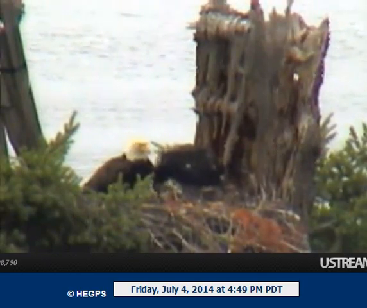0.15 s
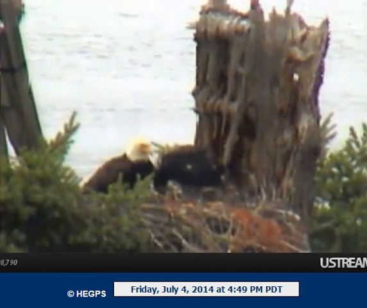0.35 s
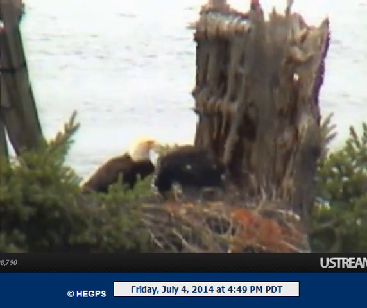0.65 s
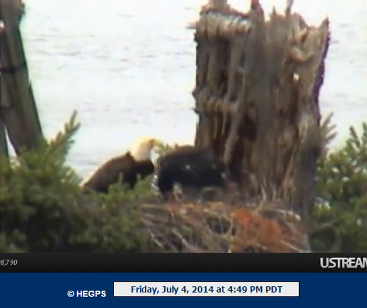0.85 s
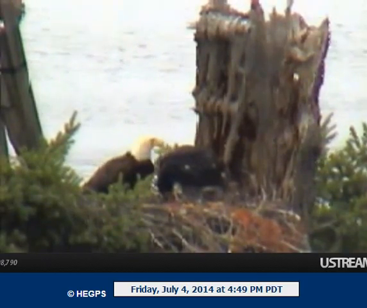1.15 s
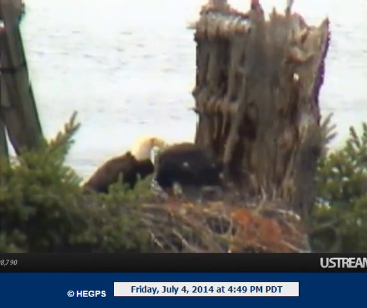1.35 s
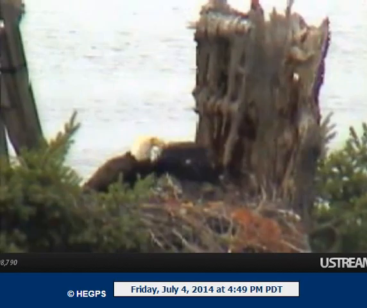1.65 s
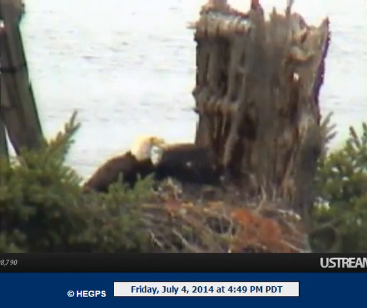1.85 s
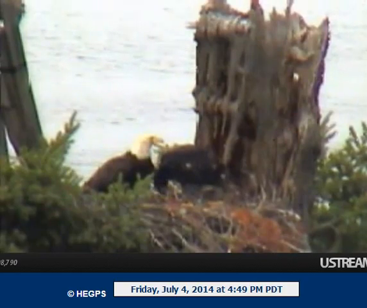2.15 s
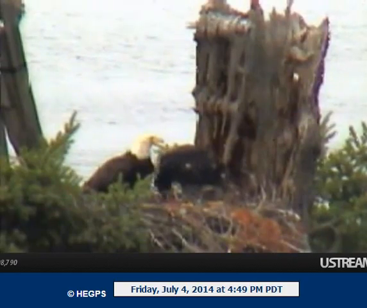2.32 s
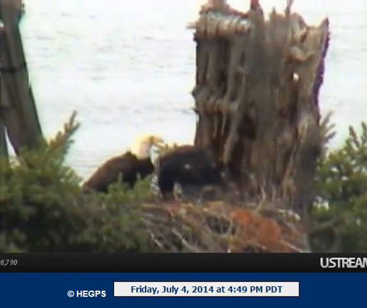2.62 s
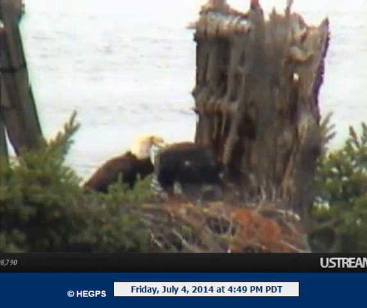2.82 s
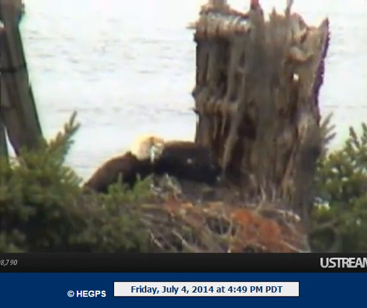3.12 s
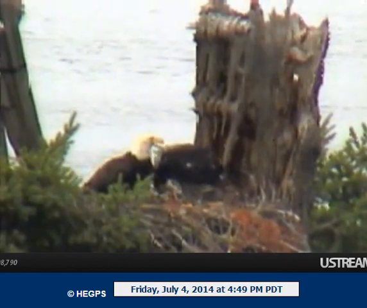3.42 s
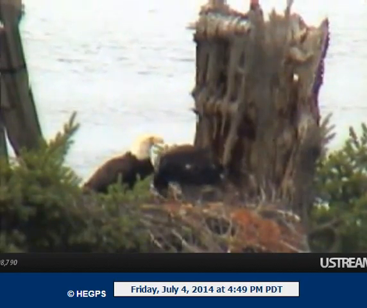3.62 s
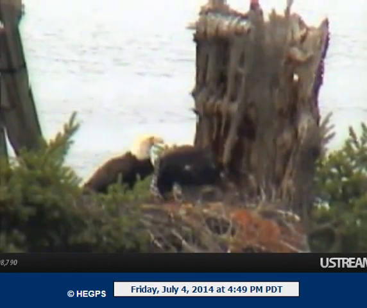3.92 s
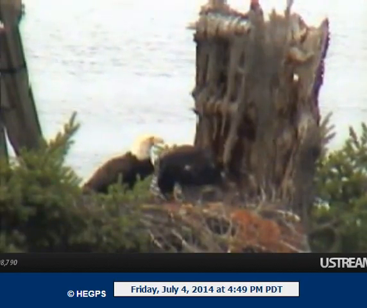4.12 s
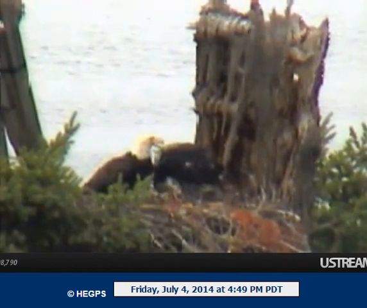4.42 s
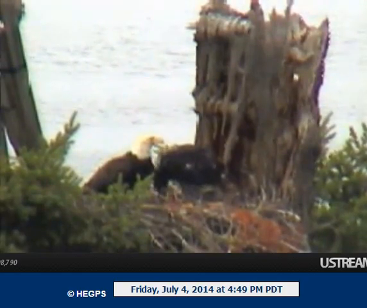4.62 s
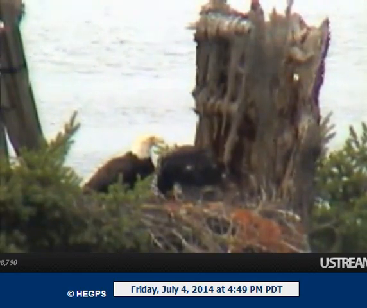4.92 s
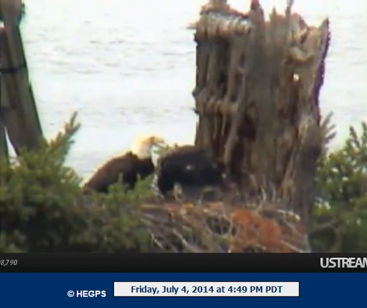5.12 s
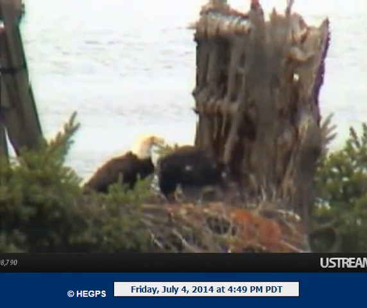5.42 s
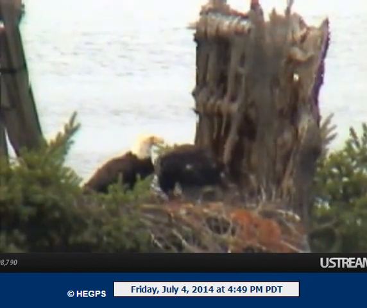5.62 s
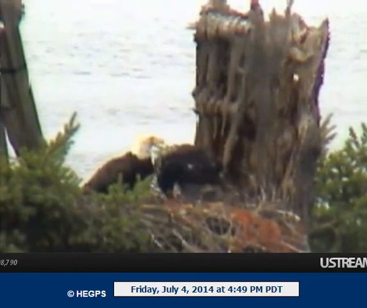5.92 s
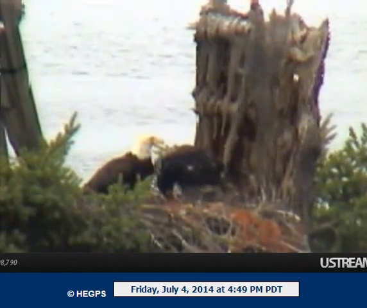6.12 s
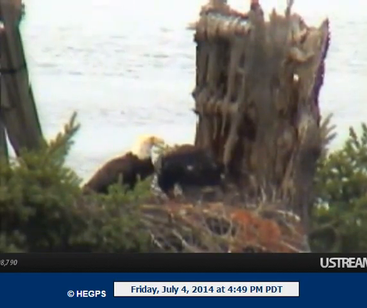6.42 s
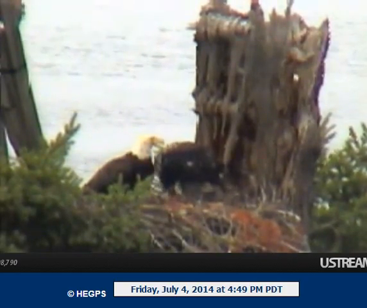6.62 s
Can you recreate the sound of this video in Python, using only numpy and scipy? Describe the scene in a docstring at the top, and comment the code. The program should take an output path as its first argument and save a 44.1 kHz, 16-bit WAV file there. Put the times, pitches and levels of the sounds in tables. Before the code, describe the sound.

A low, hollow rumble of wind and distant surf runs for the whole seven seconds and is the loudest sound. Low hums waver beneath it, with a thin electrical buzz and a few soft passing tones. From the start until about 2 seconds, a distant crow gives five rough, evenly spaced caws with a slight echo. A young eagle whistles faintly in a quick run of short, high, breathy, gliding notes during the first second, and adds one note near 2 seconds. More faint runs follow at about 3 to 3.5 seconds, 4.3 to 5 seconds and 6 to 6.7 seconds. Twigs tick lightly in the nest here and there from 1.2 to 6.4 seconds. Puffs of wind knock on the microphone with short, dull thumps between 1.4 and 4.8 seconds, the strongest at about 4.4 seconds.

```python
"""A hollow by the shore, wind and surf booming around the microphone and puffs knocking it.
In a nest above, a young eagle whistles faintly in gliding, breathy notes, and twigs tick.
Further off a crow caws five times, rough pulses through its throat; trunks and water echo both birds.
Low hums waver underneath and a few soft tones pass. The line carries a thin mains buzz,
and a coarse change of sampling rate casts pale copies of every sound into the treble."""
import sys
import numpy as np
from scipy import signal
from scipy.fft import rfft, irfft
from scipy.io import wavfile
from scipy.ndimage import uniform_filter1d

SR = 44100
rng = np.random.default_rng(int(sys.argv[2]) if len(sys.argv) > 2 else 0)


def pcm_store(signal):
    """Save signal as 16-bit PCM."""
    levels = np.round(np.clip(np.atleast_2d(signal), -1, 1) * 32767)
    wavfile.write(sys.argv[1], SR, levels.astype(np.int16).T)


N = 298116

# buzz on the line, odd multiples of the mains from the eleventh up: level_db
BUZZ_HARMONICS = [-47.5, -58, -54.5, -68.5, -58.5, -53, -52.5, -69.5, -61, -70.5, -57, -74, -62.5, -59.5,
                  -61.5, -75.5, -68.5, -71, -60, -67.5, -67.5, -61.5, -61, -61.5, -63, -64, -66.5, -68.5,
                  -69]
# steady low hums: pitch_hz, level_db
HUMS = [(121, -24), (153.5, -30.5), (180, -37.5), (346.75, -36.5)]
# soft passing tones: start_s, length_s, pitch_hz, level_db
PASSING_TONES = [(0.12, 0.37, 283.3, -27.5), (.72, 0.15, 281, -27.5), (3.84, 0.12, 542.4, -35.5),
                 (4.968, .08, 785, -38), (6.163, 0.15, 632, -34.5)]
# the hollow around the microphone, odd modes of a closed tube: centre_hz, width_hz, lift_db
HOLLOW_MODES = [(115.1, 47, 13), (348, 28, 2.5), (640, 180, 3.5), (818.5, 61, 7)]
# colour of the far surf: frequency_hz, relative_db
SURF_SPECTRUM = [(120, -36.5), (200, -13), (231, -9.5), (311, -10), (346, -1), (376, -11.5), (489, -18),
                 (578, -9.5), (691, -20.5), (1060, -15.5), (1200, -18.5), (3460, -35), (4500, -56),
                 (7610, -120)]
# colour of the wind's boom: frequency_hz, relative_db
WIND_SPECTRUM = [(25, -23.5), (50, -13), (80, -13), (150, -13), (200, -22.5), (300, -32.5), (420, -49)]
# strength of the boom from gust to gust: time_s, level_db
WIND_GUSTS = [(0, -11), (.8, -13.5), (1.4, -10), (2.2, -11.5), (2.7, -11), (4.2, -12), (4.7, -13.5),
              (5.5, -12.5), (6.76, -11.5)]
# puffs of wind on the microphone: time_s, peak_db, pitch_hz
WIND_KNOCKS = [(1.434, -17.5, 178), (1.907, -16.5, 179.6), (2.449, -17, 212.7), (2.738, -19.5, 177.5),
               (3.121, -16, 213.6), (3.713, -20, 179), (4.359, -21.5, 182.3), (4.428, -10.5, 184.5),
               (4.809, -23.5, 344)]
# twigs in the nest: time_s, level_db, pitch_hz
TWIG_TICKS = [(1.2414, -32, 2780), (1.5598, -44.5, 3410), (1.9046, -28.5, 2517), (2.792, -32, 3416),
              (2.9338, -36, 2750), (3.6094, -41.5, 3190), (3.6963, -35.5, 3180), (3.789, -37.5, 2780),
              (4.4823, -24.5, 1290), (4.9748, -33.5, 2870), (5.0676, -41, 2390), (6.1801, -43, 2870),
              (6.2784, -29.5, 1085), (6.2784, -41, 3120), (6.411, -38.5, 2827)]
# resonances of the crow's throat: centre_hz, width_hz, gain_db
CROW_FORMANTS = [(1434, 420, 6.5), (2040, 400, -5), (2288, 300, -4), (3720, 500, -30.5)]
# the far crow's calls: start_s, length_s, effort_db, top_hz, top_after_s
CROW_CAWS = [(0.152, .21, -27, 321.3, 0.07), (0.529, .24, -26.5, 319, 0.088),
             (0.962, .23, -27.5, 316, .095), (1.375, .235, -28, 323, .095),
             (1.828, 0.22, -28, 321.8, 0.094)]
# the eagle's notes: start_s, length_s, level_db, swell_db, first_hz, middle_hz, last_hz
EAGLE_WHISTLES = [ (0.094, .08, -52, 0, 3480, 3455, 3470), (0.173, .1, -46.5, 1, 3410, 3405, 3320),
                  (0.287, .095, -44.5, 0, 3660, 3660, 3670), (0.376, .115, -47, -2, 3730, 3780, 3760),
                  (0.301, .2, -55, 0, 3190, 3270, 3430), (0.502, .085, -44.5, -1.5, 3425, 3346, 3310),
                  (0.576, .2, -49, -7, 3330, 3410, 3360), (.75, .06, -51.5, -2.5, 3510, 3530, 3460),
                  (0.797, .095, -50, 2.5, 3110, 2890, 2910), (1.936, .075, -50, 3, 3450, 3420, 3350),
                  (2.982, .12, -53, 0, 2950, 2920, 2995), (3.335, .05, -50, 1, 2910, 2910, 2800),
                  (3.374, .165, -46, 9, 2886, 3130, 3170), (3.525, .05, -55.5, -5, 3220, 3196, 3210),
                  (4.345, .03, -42.5, 0, 2170, 2200, 2190), (4.385, 0.078, -47.5, -6, 2830, 2826, 2870),
                  (4.493, 0.06, -53, 1, 2770, 2820, 2830), (4.665, .08, -56.5, 4, 2885, 2890, 3060),
                  (4.758, .075, -49.5, 3, 3076, 3110, 3160), (4.795, .06, -54.5, -1.5, 3450, 3670, 3720),
                  (4.842, .035, -50.5, 1, 3240, 3246, 3330), (4.882, .115, -53, 1.5, 2870, 2880, 2810),
                  (5.996, .06, -40.5, 2.5, 2184, 2116, 2270), (6.055, .195, -46.5, -0.5, 2794, 2826, 3000),
                  (6.356, .08, -48, -0.5, 3010, 2825, 2875), (6.458, .08, -44.5, -1, 3070, 3136, 3390),
                  (6.536, .04, -51.5, -5, 3366, 3310, 3230), (6.507, .055, -50, 0.5, 3750, 3884, 3700),
                  (6.564, .07, -46.5, -6.5, 3436, 3300, 3136), (6.637, .028, -38.5, -2, 2200, 2140, 2080), ]
# the recorder's tone control: frequency_hz, gain_db
TONE_CURVE = [(10, 1), (150, 1), (320, -3), (3500, -3), (4300, 0), (22050, 0)]


def gain_of(db):
    return 10 ** (np.asarray(db) / 20)


def unit_rms(x):
    return x / np.sqrt(np.mean(x ** 2) + 1e-20)


def curve_db(points, hz):
    """A curve read on a log frequency axis, -120 dB beyond its ends."""
    point_hz, db = np.transpose(points)
    return np.interp(np.log(hz + 1), np.log(point_hz + 1), db, left=-120, right=-120)


def add(mix, start_s, sound):
    part = mix[round(start_s * SR):][:len(sound)]
    part += sound[:len(part)]


def wander(n, hz):
    """Smooth random drift of rms 1 that changes about hz times a second."""
    span = max(int(SR / hz), 1)
    noise = rng.standard_normal(n + 2 * span)
    return unit_rms(uniform_filter1d(uniform_filter1d(noise, span), span))[span:span + n]


def resonate(x, hz, width_hz):
    """Two like resonances in series that follow the curve hz: shift to zero, smooth, shift back."""
    turn = np.exp(2j * np.pi * np.cumsum(hz) / SR)
    pole = np.exp(-np.pi * width_hz / SR)
    for _ in range(2):
        x = 2 * (turn * signal.lfilter([1 - pole], [1, -pole], x / turn)).real
    return x


def fade(t, rise_s, fall_s):
    """Soft attack, hold and soft release."""
    return np.sin(np.pi / 2 * np.clip(np.minimum(t / rise_s, (t[-1] - t) / fall_s), 0, 1)) ** 2


def sine(cycles):
    """A sine of rms 1."""
    return np.sqrt(2) * np.sin(2 * np.pi * cycles)


def mains_buzz(t, mains_hz=59.977):
    """High odd harmonics of the mains, thin and steady on the line."""
    return sum(gain_of(db) * sine(mains_hz * (11 + 2 * k) * t + rng.random())
               for k, db in enumerate(BUZZ_HARMONICS))


def low_tones(t):
    """Hums that waver a little in level, and soft tones that swell and fade over them."""
    hums = sum(gain_of(db + 1.5 * wander(N, 4)) * sine(hz * t + rng.random()) for hz, db in HUMS)
    for start_s, length_s, hz, db in PASSING_TONES:
        n = int(length_s * SR)
        envelope = gain_of(db + 2 * wander(n, 12)) * signal.windows.tukey(n, .6)
        add(hums, start_s, envelope * sine(hz * t[:n]))
    return hums


def hollow_noise(spectrum, patchy_db):
    """Noise with drifting patches, coloured by a spectrum and by the modes of the hollow."""
    real, imag, patches = rng.standard_normal((N // 128 + 9, 257, 3)).T
    patches = unit_rms(uniform_filter1d(uniform_filter1d(patches, size=6, axis=0), size=25, axis=1))
    frames = (real + 1j * imag) * gain_of(patchy_db * patches)
    noise = signal.istft(frames, nperseg=512, noverlap=384)[1][:N]
    hz = np.fft.rfftfreq(N, 1 / SR)
    lift_db = sum(db / (1 + (2 * (hz - centre) / width) ** 2) for centre, width, db in HOLLOW_MODES)
    return unit_rms(irfft(rfft(noise) * gain_of(curve_db(spectrum, hz) + lift_db), N))


def far_surf(t, level_db=-27.5, ebb_db_per_s=-.4042):
    """Distant surf, heard from inside the hollow, slowly ebbs."""
    return hollow_noise(SURF_SPECTRUM, patchy_db=1.3) * gain_of(level_db + ebb_db_per_s * t)


def wind_boom(t):
    """Wind booms in the hollow, following the gusts."""
    boom = hollow_noise(WIND_SPECTRUM, patchy_db=.96)
    power = abs(uniform_filter1d(boom ** 2, size=2600))
    steadied = unit_rms(boom / (power + .05) ** .035)  # strong swells are held back a little
    return gain_of(np.interp(t, *np.transpose(WIND_GUSTS))) * steadied


def wind_knock(peak_db, hz, rise_s=.0027):
    """A sudden puff hits the microphone with a short, low thump."""
    t = np.arange(2600) / SR
    envelope = t / rise_s * np.exp(1 - t / rise_s)
    return gain_of(peak_db) * envelope * np.sin(2 * np.pi * hz * t)


def twig_tick(level_db, hz, rise_s=.0008):
    """A twig ticks in the nest: a few uneven cycles with a soft start."""
    t = np.arange(400) / SR
    envelope = t / rise_s * np.exp(1 - t / rise_s)
    phase = 2 * np.pi * hz * t
    snap = np.sin(phase) + .5 * np.sin(phase * rng.uniform(.86, 1.12) + 1)
    return gain_of(level_db) * envelope * snap


def shore_echoes(calls, decay_s=.22):
    """Scattered echoes from trunks and water that die away quickly."""
    t = np.arange(SR // 2) / SR
    taps = rng.standard_normal(len(t)) * (rng.random(len(t)) < .05)
    taps *= gain_of(-60 * t / decay_s) * (t > .006)
    return signal.fftconvolve(calls, taps / np.linalg.norm(taps))[:N]


def crow_caw(length_s, effort_db, top_hz, top_after_s, rest_hz=280, arch_s=.035, accent_db=1.5, sag_db=2):
    """The far crow: jittered pulses and puffs of breath pass the throat; the pitch arches once."""
    t = np.arange(0, length_s, 1 / SR)
    n, progress = len(t), t / length_s
    arch = np.exp(-((t - top_after_s) / arch_s) ** 2)
    hz = rest_hz + (top_hz - rest_hz) * arch
    # the voice frays as the breath runs out and clears on the arch
    rough = np.clip(.35 + .27 * progress - .2 * arch, 0, 1)
    cycles = np.cumsum(hz * (1 + .024 * wander(n, 180))) / SR
    pulses = sum(np.cos(2 * np.pi * k * cycles) for k in range(3, 13))
    pulses *= 1 + 1.1 * rough * np.cos(np.pi * cycles)  # every other pulse is weaker
    puffs = (.48 + np.exp(-(cycles % 1) / .3)) * rng.standard_normal(n)
    drive = (1 - rough) * unit_rms(pulses) + rough * unit_rms(puffs)
    gape = (hz / 295) ** .3  # the beak opens wider on the higher pitches
    voice = sum((-1) ** k * gain_of(db) * resonate(drive, centre * gape, width)
                for k, (centre, width, db) in enumerate(CROW_FORMANTS))
    throbs = np.cumsum(50 * (1 + .25 * wander(n, 43))) / SR  # about fifty a second
    rasp = 1 + .35 * np.sin(2 * np.pi * (throbs + rng.random()))
    push = gain_of(effort_db + accent_db * arch - sag_db * progress)
    return push * rasp * unit_rms(voice) * fade(t, rise_s=.03, fall_s=.05)


def eagle_whistle(length_s, level_db, swell_db, first_hz, middle_hz, last_hz):
    """The eagle at the nest: a fluttering near sine on a curved glide, with air hissing around it."""
    t = np.arange(0, length_s, 1 / SR)
    n, position = len(t), 2 * t / length_s - 1  # -1 at the start of the note, 1 at its end
    bend_hz = (first_hz + last_hz) / 2 - middle_hz
    hz = middle_hz + (last_hz - first_hz) / 2 * position + bend_hz * position ** 2
    cycles = np.cumsum(hz * (1 + .005 * wander(n, 90))) / SR
    strength = gain_of(level_db + swell_db / 2 * position + 1.8 * wander(n, 60))
    air = unit_rms(resonate(rng.standard_normal(n), hz, width_hz=300))
    return strength * (sine(cycles) + .32 * air) * fade(t, rise_s=.017, fall_s=.015)


def scene():
    """Shore, nest and birds at one microphone in the hollow."""
    t = np.arange(N) / SR
    eagle, crow, twigs, knocks = np.zeros((4, N))
    for start_s, *note in EAGLE_WHISTLES:
        add(eagle, start_s, eagle_whistle(*note))
    for start_s, *call in CROW_CAWS:
        add(crow, start_s, crow_caw(*call))
    for time_s, db, hz in TWIG_TICKS:  # ticks and knocks start early to peak near their time
        add(twigs, time_s - .0007, twig_tick(db, hz))
    for time_s, db, hz in WIND_KNOCKS:
        add(knocks, time_s - .003, wind_knock(db, hz))
    echoes = shore_echoes(gain_of(-9) * eagle + gain_of(-4) * crow)  # the farther bird sounds wetter
    background = wind_boom(t) + far_surf(t) + low_tones(t) + mains_buzz(t)
    return (background + knocks + twigs + echoes + crow + eagle)[None]


def record(dry, knee=3.3, edge_hz=9250):
    """The recorder: lopsided overload, a coarse rate change, a tone control, then the band limit."""
    ceiling = np.where(dry > 0, .75, 1.6)  # positive swings flatten first
    squashed = dry / (1 + abs(dry / ceiling) ** knee) ** (1 / knee)
    fine = signal.resample_poly(squashed - squashed.mean(), 160, 147, axis=1)  # 48 kHz
    # back to SR by the nearest sample: the timing error repeats 3900 times a second
    nearest = np.round(np.arange(N) * 160 / 147).astype(int)
    coarse = fine[:, np.minimum(nearest, fine.shape[1] - 1)]
    toned = irfft(rfft(coarse) * gain_of(curve_db(TONE_CURVE, np.fft.rfftfreq(N, 1 / SR))), N)
    lowpass = signal.firwin(511, edge_hz, window=("kaiser", 6), fs=SR)
    return signal.oaconvolve(np.clip(toned, -1, 1), lowpass[None], "same")


dry = scene()
out = record(dry)
pcm_store(out)
```